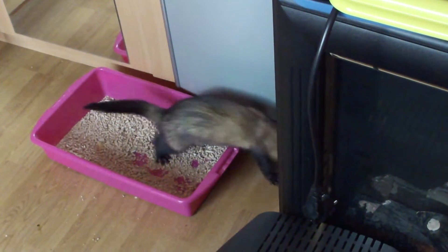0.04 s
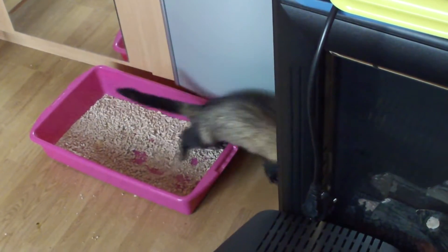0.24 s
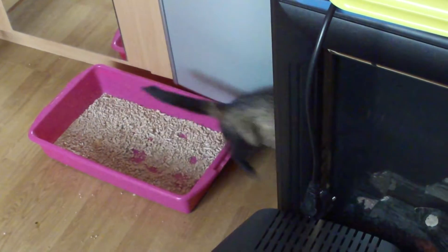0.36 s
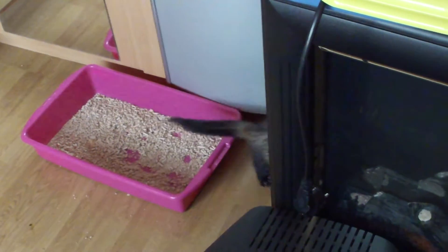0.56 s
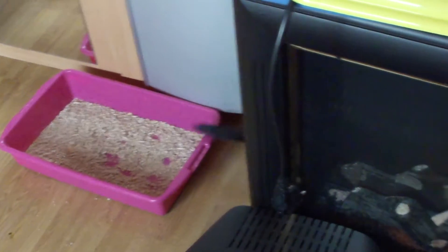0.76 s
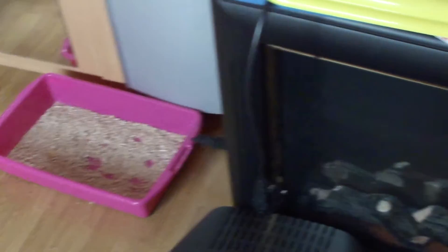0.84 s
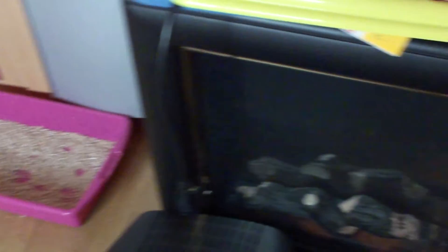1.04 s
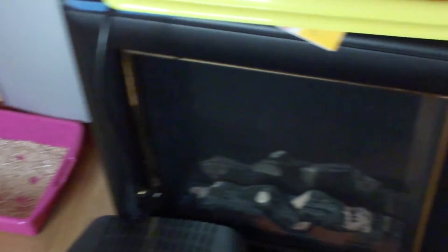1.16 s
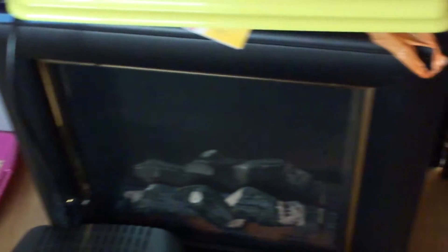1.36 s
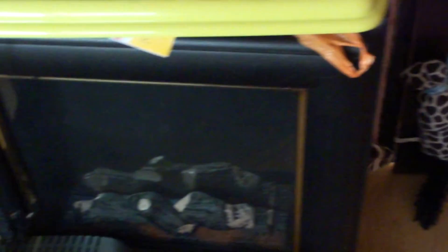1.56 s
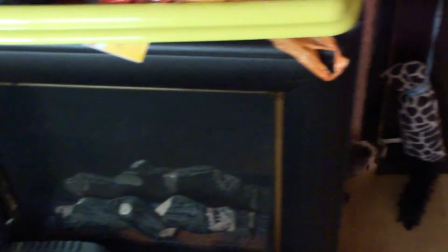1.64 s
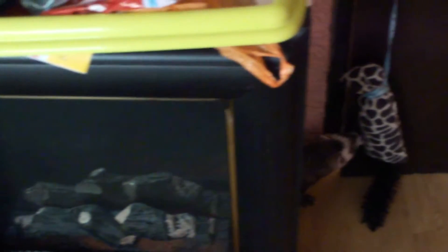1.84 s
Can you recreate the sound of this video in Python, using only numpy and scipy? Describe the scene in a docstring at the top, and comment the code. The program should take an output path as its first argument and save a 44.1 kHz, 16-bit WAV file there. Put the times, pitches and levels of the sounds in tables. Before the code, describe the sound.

In a small room with a soft hiss, a ferret's claws scratch a plastic tray while litter pellets shift and click. Light paw thuds on wood follow, then faint rustles and ticks as it walks away.

```python
"""A ferret climbs out of a plastic litter tray in a small room. First its claws scrape and a kick of the
hind feet sets the tray ringing, while litter pellets shift and scatter in bright bursts. Around half a
second in, its paws thud and clack onto the wooden floor; then it patters away with faint rustles and ticks.
A quiet hiss with a faint whine lies under it all. The microphone has three narrow notches in the treble."""
import sys
import numpy as np
from scipy import signal
from scipy.io import wavfile
from scipy.ndimage import uniform_filter1d

SR = 44100
rng = np.random.default_rng(int(sys.argv[2]) if len(sys.argv) > 2 else 0)


def to_wav(s):
    """Save 16-bit WAV."""
    ch = np.atleast_2d(s).T  # columns
    pcm = np.round(np.clip(ch, -1, 1) * 32767)  # PCM
    wavfile.write(sys.argv[1], SR, pcm.astype(np.int16))


N = 83790

# claws slipping on the tray: start t/s, length t/s, level/dB
CLAW_SCRAPES = [(0.0, 0.21, -51.5), (.107, 0.012, -36.5), (.1165, 0.021, -30.5), (.137, 0.045, -39),
                (.172, 0.079, -47.5), (.308, 0.032, -44), (.336, 0.06, -47.5), (.455, 0.059, -54.5),
                (.535, 0.04, -61), (.6, 0.087, -62.5)]
# ringing modes of the plastic tray: f/Hz, relative level/dB
TRAY_RESONANCES = [(418, -7.5), (529, -5.5), (716, -8), (853, -9.5), (900, 1.5), (951, -9), (1118, -7),
                   (1212, -7), (1281, 4), (1367, -17), (1613, -7), (1702, 2), (1889, -7), (2100, -4.5)]
# dull rasp of the litter-filled tray: f/Hz, relative level/dB
RASP_SPECTRUM = [(60, -37), (180, -15.5), (380, -5), (650, -4), (1200, 4), (1900, 1.5), (2550, -5),
                 (3300, -15), (6000, -24), (15000, -53)]
# paws knocking rim and floor: t/s, level/dB, thud f/Hz, thud T60 t/s, clack level/dB relative to the thud
PAW_KNOCKS = [(.0145, -34.5, 940, 0.011, -16.5), (.168, -34.5, 476, 0.024, -8),
              (.396, -43.5, 440, 0.085, -11), (.397, -41.5, 256, .08, -14), (0.4, -48, 183, 0.12, -21),
              (0.4617, -41, 504, .08, -5.5), (.4875, -32.5, 675, 0.0092, -13), (.539, -42, 477, 0.021, -9),
              (.555, -50, 494, 0.023, -1), (.576, -40, 1990, .014, -21), (0.938, -45.5, 590, 0.022, -2),
              (1.453, -51.5, 450, 0.032, -5.5), (1.862, -52.5, 554, 0.036, -1.5)]
# woody tone of a paw's clack: f/Hz, relative level/dB
CLACK_SPECTRUM = [(80, -17.5), (200, -10.5), (400, 2.5), (800, 1.5), (1200, -9), (2200, -23.5), (4000, -18),
                  (12000, -55)]
# litter shifting and scattering: start t/s, length t/s, level/dB
LITTER_BURSTS = [(0.0, 0.081, -63.5), (.087, 0.011, -53), (.0955, .021, -46.5), (.1165, 0.0075, -40),
                 (.126, 0.048, -51.5), (.16, 0.01, -40.5), (.171, 0.044, -57), (.309, 0.011, -51),
                 (.324, 0.067, -60.5), (.3735, .01, -46.5), (.384, 0.023, -61), (.454, 0.014, -51),
                 (.462, 0.0033, -57), (.474, 0.054, -66.5), (.55, 0.017, -60.5)]
# bright tone of a pellet's click: f/Hz, relative level/dB
PELLET_SPECTRUM = [(200, -21), (2000, 0.5), (3500, -5.5), (4500, -7.5), (6000, 5), (8300, 0), (10300, -4.5),
                   (12000, -30), (13500, -33), (14700, -15)]
# single pellets and claw tips clicking: t/s, level/dB, ring f/Hz, ring T60 t/s
HARD_CONTACTS = [(0.06, -52, 7000, .006), (0.095, -36, 8700, .004), (0.1165, -33.5, 8300, 0.0066),
                 (0.266, -48.5, 7400, .01), (.488, -48, 1780, 0.18), (0.5758, -45, 6460, 0.0033),
                 (1.0245, -47.5, 7460, 0.0059), (1.315, -63, 3370, 0.039)]
# faint rustles as the ferret walks off: start t/s, length t/s, level/dB
WALK_RUSTLES = [(.645, 0.019, -66), (.83, 0.042, -67.5), (.935, 0.022, -71), (1.11, 0.017, -66),
                (1.148, 0.016, -65), (1.295, 0.024, -66), (1.422, 0.011, -63), (1.45, 0.011, -59.5),
                (1.597, 0.026, -64), (1.811, 0.014, -61), (1.857, 0.011, -60.5)]
# reverb decay of the small room: f/Hz, T60 t/s
ROOM_DECAY = [(150, 0.47), (1000, 0.59), (4000, 0.44), (12000, 0.33)]
# colour of the room hiss: f/Hz, relative level/dB
HISS_SPECTRUM = [(25, 7), (70, -12.5), (130, -3), (260, 0.5), (550, 2), (1100, -1), (2000, -5),
                 (2400, -10.5), (2800, -21), (4500, -23), (6000, -16.5), (8000, -18), (10000, -23.5),
                 (12500, -46.5), (15500, -30)]
# stereo width of the hiss: f/Hz, left-right correlation
HISS_CORRELATION = [(60, -0.56), (300, -0.28), (2500, -0.23), (7000, -0.038)]
# centres of the microphone's notches: f/Hz
MIC_NOTCHES = [3030, 4020, 5000]

LITTER_LEFT_DB = 1.2  # bursts and ticks sit slightly to the left


def tray():
    """Claws stick and slip on the tray with a dull rasp; the slips and one kick ring the same modes."""
    kick_at_s, kick_rise_s, kick_gain_db, ring_gain_db = 0.114, 0.0068, -33.5, -11.5
    t = np.arange(N) / SR
    slips = strokes(CLAW_SCRAPES, per_s=1800, spread_db=1, rise_s=0.0023, fall_s=0.0026)
    modes = sum(amp(db) * np.sin(2 * np.pi * (hz * t + rng.random())) for hz, db in TRAY_RESONANCES)
    modes *= decay(t, t60=0.21)
    scrape = ring(slips, click(RASP_SPECTRUM))
    scrape += amp(ring_gain_db) * ring(slips, modes / np.linalg.norm(modes))
    kick = amp(kick_gain_db) * modes * (1 - np.exp(-t / kick_rise_s))
    kick = np.pad(kick, (round(kick_at_s * SR), 0))[:N]
    return pan(left_db=-0.17) * (room(scrape, wet_db=-10) + room(kick, wet_db=-18))


def paws():
    """Each paw lands with a damped thud and a short, woody clack of noise."""
    t, knocks = np.arange(N) / SR, np.zeros(N)
    wood = click(CLACK_SPECTRUM)
    for start, db, hz, t60, clack_db in PAW_KNOCKS:
        age = np.maximum(t - start, 0)
        attack = 1 - np.exp(-age * hz * 2)
        thud = np.sin(2 * np.pi * hz * age) * attack * decay(age, t60)
        burst = rng.standard_normal(N) * (t > start) * decay(age, t60=0.12)
        knocks += amp(db) * (thud + amp(clack_db) * ring(burst, wood))
    return room(knocks, wet_db=-4.5)


def litter():
    """Pellets collide in dense, bright bursts."""
    hits = strokes(LITTER_BURSTS, per_s=2600, spread_db=0.5, rise_s=0.00076, fall_s=0.0045)
    return pan(LITTER_LEFT_DB) * room(ring(hits, click(PELLET_SPECTRUM)), wet_db=-2)


def ticks():
    """A single pellet or claw tip strikes: a sharp crack and one brief ring."""
    t, hits, rings = np.arange(N) / SR, np.zeros(N), np.zeros(N)
    for start, db, hz, t60 in HARD_CONTACTS:
        age = np.maximum(t - start, 0)
        rings += amp(db) * np.sin(2 * np.pi * hz * age) * decay(age, t60)
        hits[round(start * SR)] += amp(db - 4)  # the crack sits 4 dB under the ring
    pellet = click(PELLET_SPECTRUM)
    cracks = ring(hits, pellet / abs(pellet).max())
    return pan(LITTER_LEFT_DB) * room(rings + cracks, wet_db=-1.5)


def rustles():
    """Soft, fine-grained scuffs from farther off, with as much reverb as direct sound."""
    hits = strokes(WALK_RUSTLES, per_s=6000, spread_db=6.5, rise_s=0.0021, fall_s=0.0057)
    return amp(-0.5) * pan(left_db=1.5) * room(ring(hits, click(PELLET_SPECTRUM)), wet_db=0)


def hiss():
    """A wide, steady bed of room hiss whose colour drifts slightly."""
    level_db, drift_db = -53, 0.67
    hz = np.fft.rfftfreq(1024, 1 / SR)
    noise = rng.standard_normal((N // 256 + 5, len(hz), 5)).T
    left, independent = noise[0] + 1j * noise[1], noise[2] + 1j * noise[3]
    correlation = read(HISS_CORRELATION, hz)[:, None]
    right = correlation * left + np.sqrt(1 - correlation ** 2) * independent
    drift = uniform_filter1d(noise[4], size=12, axis=0)  # smooth across frequency
    drift = unit(uniform_filter1d(drift, size=10, axis=1))  # and over time
    colour = amp(read(HISS_SPECTRUM, hz)[:, None] + drift_db * drift)
    air = signal.istft(np.array([left, right]) * colour, nperseg=1024, noverlap=768)[1][:, :N]
    return amp(level_db) * pan(left_db=-0.5) * unit(air)


def whine():
    """A faint, centred tone that wavers in pitch."""
    level_db, pitch_hz, waver_hz = -70, 925, 6
    waver = unit(uniform_filter1d(rng.standard_normal(N), size=2000))
    phase = 2 * np.pi * np.cumsum(pitch_hz + waver_hz * waver) / SR
    return amp(level_db) * unit(np.sin(phase))


def room(x, wet_db):
    """Direct sound plus a short tail of scattered reflections, different at each ear."""
    length = SR // 2
    reflections = rng.standard_normal((2, length)) * (rng.random((2, length)) < 0.1)
    reflections *= np.arange(length) > 0.002 * SR  # 2 ms pre-delay
    hz, t, bands = signal.stft(reflections, SR, nperseg=256)
    tails = signal.istft(bands * decay(t, read(ROOM_DECAY, hz)[:, None]), SR)[1]
    return x + amp(wet_db) * np.array([ring(x, tail / np.linalg.norm(tail)) for tail in tails])


def strokes(rows, per_s, spread_db, rise_s, fall_s):
    """Clouds of tiny, irregular impacts that rise, hold and die away."""
    t, out = np.arange(N) / SR, np.zeros(N)
    for start, length, db in rows:
        hits = (rng.random(N) < per_s / SR) * rng.choice([-1, 1], N)
        accents = amp(spread_db * np.minimum(rng.exponential(1, N), 3))
        attack = np.clip((t - start) / rise_s, 0, 1)
        envelope = attack * np.exp(-np.maximum(t - start - length, 0) / fall_s)
        out += amp(db) * unit(hits * accents * envelope) * np.sqrt(np.mean(envelope ** 2))
    return out


def click(spectrum, size=4096):
    """A minimum-phase click of energy 1 with the given spectrum."""
    hz = abs(np.fft.fftfreq(size, 1 / SR))
    log_gain = np.log(amp(read(spectrum, hz)))
    response = np.exp(np.conj(signal.hilbert(log_gain)))
    pulse = np.fft.ifft(response).real[:size // 2]
    return pulse / np.linalg.norm(pulse)


def ring(x, response):
    """Plays x through an impulse response."""
    return signal.fftconvolve(x, response)[:N]


def decay(age, t60):
    """An envelope that falls by 60 dB in t60 seconds."""
    return np.exp(-np.log(1000) * age / t60)


def read(points, hz):
    """Reads a curve on a log-frequency axis."""
    f, value = np.transpose(points)
    return np.interp(np.log(hz + 1), np.log(f + 1), value)


def pan(left_db):
    """Stereo gains: left up by left_db, right down by as much."""
    return amp([[left_db], [-left_db]])


def amp(db):
    """Decibels to gain."""
    return 10 ** (np.asarray(db) / 20)


def unit(x):
    """Scales to rms 1."""
    return x / np.sqrt(np.mean(x ** 2) + 1e-20)


def scene():
    """The ferret's climb and walk over the quiet room tone."""
    return tray() + litter() + ticks() + rustles() + paws() + hiss() + whine()


def record(dry):
    """The microphone: a bass cut, three steep treble notches, then the band limit."""
    low_cut_hz, notch_width_hz, high_cut_hz = 166, 467, 15870
    sound = signal.sosfilt(signal.butter(2, low_cut_hz, "high", fs=SR, output="sos"), dry)
    for hz in MIC_NOTCHES:
        b, a = signal.iirnotch(hz, hz / notch_width_hz, SR)
        sound = signal.lfilter(b, a, signal.lfilter(b, a, sound))  # two passes deepen and widen the dip
    band_limit = signal.firwin(511, high_cut_hz, window=("kaiser", 9), fs=SR)
    return signal.oaconvolve(sound, band_limit[None], "same")


dry = scene()
out = record(dry)
to_wav(out)
```